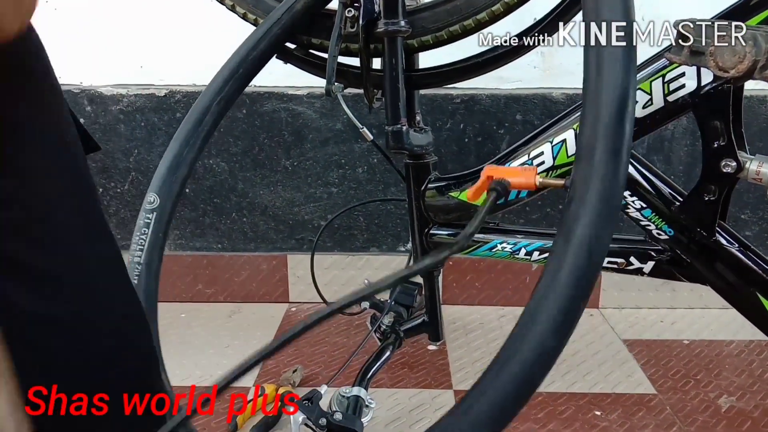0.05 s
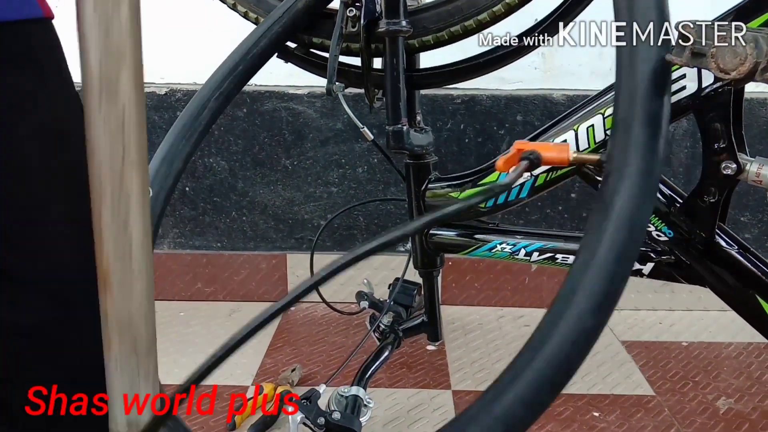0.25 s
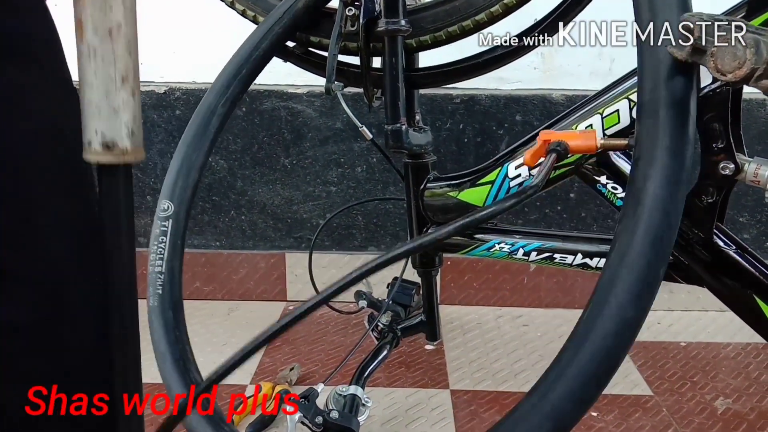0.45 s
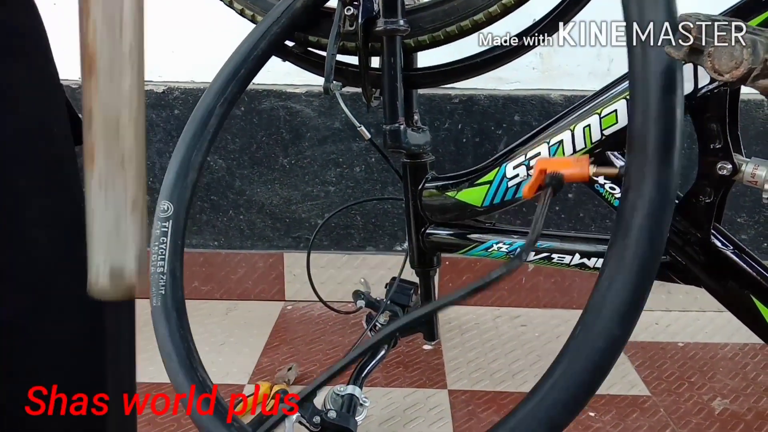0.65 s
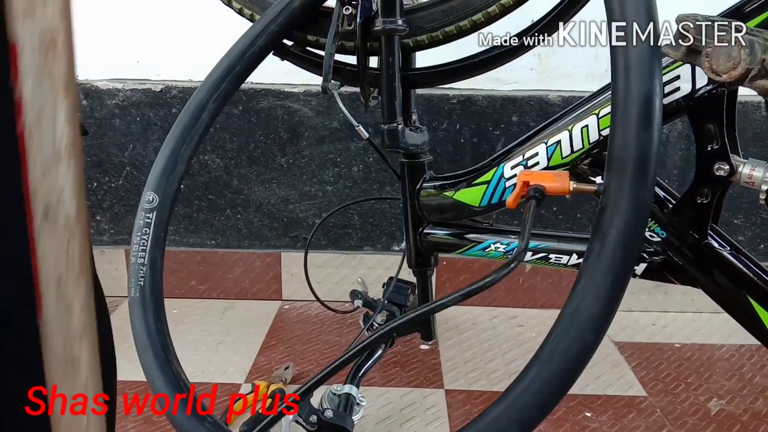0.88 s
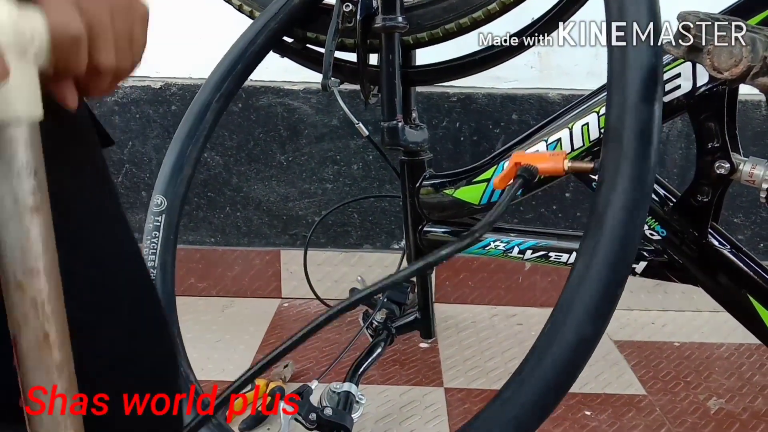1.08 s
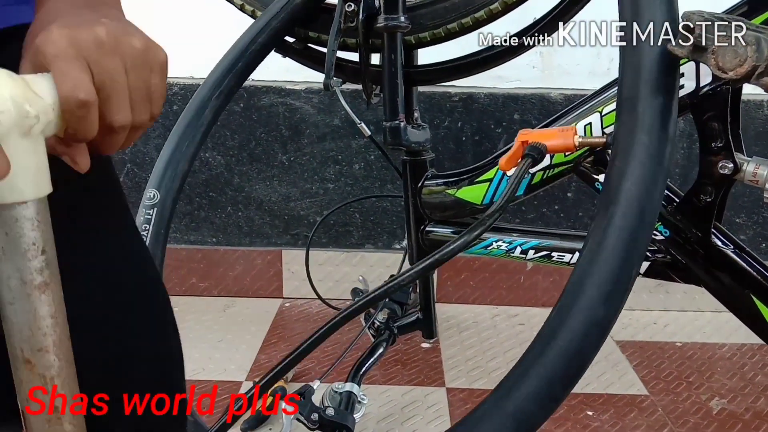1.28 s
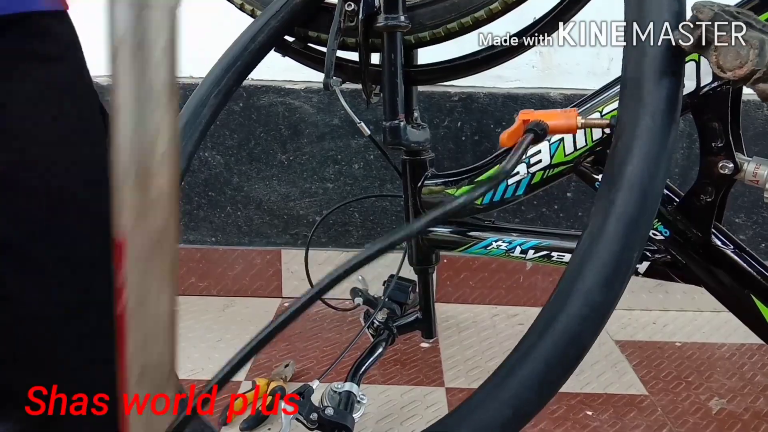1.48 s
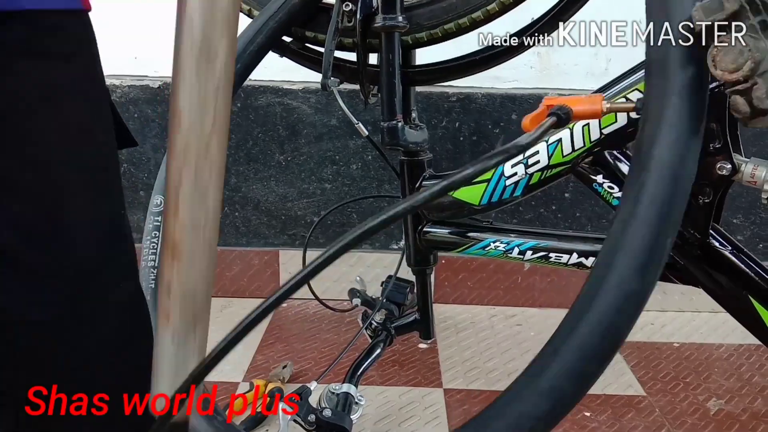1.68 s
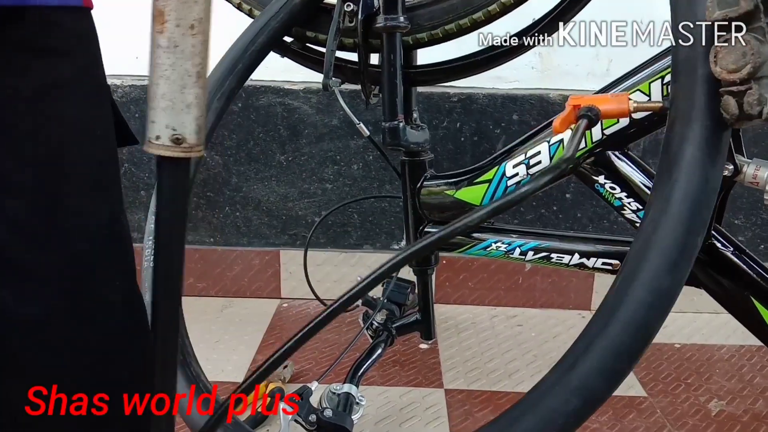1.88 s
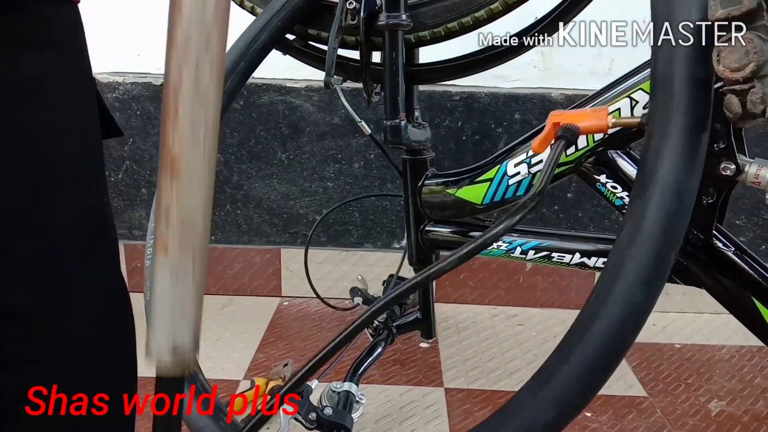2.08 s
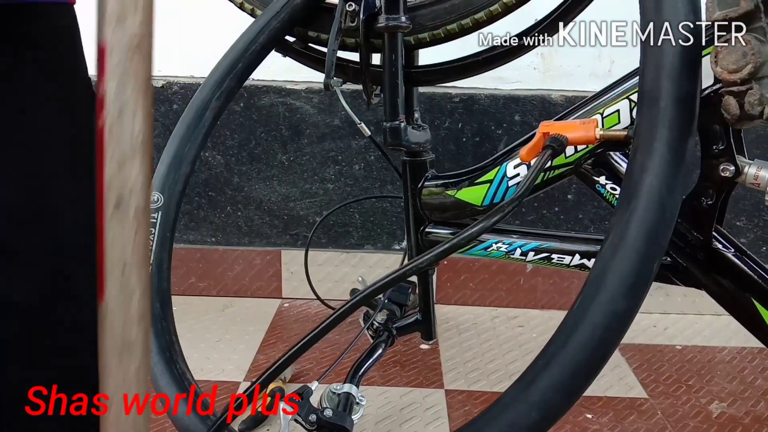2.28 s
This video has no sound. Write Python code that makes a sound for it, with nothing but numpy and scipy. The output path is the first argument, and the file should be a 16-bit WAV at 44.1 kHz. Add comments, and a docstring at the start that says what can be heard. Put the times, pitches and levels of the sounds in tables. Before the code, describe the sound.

A bicycle floor pump hisses as it is pulled up, ticks at 0.3 seconds and hits its top stop with a ringing metal clack at 0.5. Air rushes through the hose, faintly whistling, until 1.3. A second hissing pull brings a tick at 1.7 and a clack at 1.9, then another push from 2 seconds. Low rumble and thumps buffet the close microphone, mostly during the first stroke.

```python
"""Bicycle floor pump in a tiled room.

Two strokes, close to the microphone. Pulled up, the sleeve hisses through a shortening air column,
ticks as it clears the vent and clacks against its top stop, ringing the steel tube.
Pushed down, air sings through the barrel and hose. Low buffets and rumble shake the microphone."""
import sys
import numpy as np
from scipy import signal
from scipy.fft import rfft, irfft
from scipy.io import wavfile
from scipy.ndimage import uniform_filter1d

SR = 44100
rng = np.random.default_rng(int(sys.argv[2]) if len(sys.argv) > 2 else 0)


def generate_wav(signal):
    """Clip the signal to [-1, 1] and save it as 16-bit WAV at the path in sys.argv[1]."""
    frames = np.transpose(np.atleast_2d(signal))
    scaled = np.clip(frames, -1, 1) * 32767
    pcm = np.round(scaled).astype(np.int16)
    wavfile.write(sys.argv[1], SR, pcm)


N = 108045
T = np.arange(N) / SR


def amp(db):
    """Decibels to gain."""
    return 10 ** (np.asarray(db) / 20)


def unit(x):
    """Scale to rms 1."""
    return x / np.sqrt(np.mean(abs(x) ** 2) + 1e-20)


def read(points, hz):
    """Interpolate a table on a log-frequency axis."""
    freq_hz, value = np.transpose(points)
    return np.interp(np.log(hz + 1), np.log(np.maximum(freq_hz, 1)), value)


def add(mix, start_s, sound):
    """Mix a sound in at start_s."""
    part = mix[max(round(start_s * SR), 0):][:len(sound)]
    part += sound[:len(part)]


def noise(gain, size=512):
    """White noise shaped by gain(hz, t) in short frames."""
    framing = dict(nperseg=size, noverlap=size - size // 4)
    hz, t, frames = signal.stft(rng.standard_normal(N), SR, **framing)
    return signal.istft(frames * gain(hz[:, None], t[None]), SR, **framing)[1][:N]


def coloured(spectrum):
    """Steady noise of a given spectrum, rms 1."""
    gain = amp(read(spectrum, np.fft.rfftfreq(N, 1 / SR)))
    return unit(irfft(rfft(rng.standard_normal(N)) * gain, N))


def smooth_noise(shape, widths):
    """Random field of rms 1, smooth over widths in cells."""
    field = rng.standard_normal(shape)
    for axis, width in enumerate(widths):
        field = uniform_filter1d(field, max(round(width), 1), axis)
    return unit(field)


def reflected(x, echo_db, decay_s=0.01):
    """Add a quickly fading cluster of reflections off the tiles."""
    t = T[:SR // 10]
    taps = rng.choice([-1., 1.], len(t)) * (rng.random(len(t)) < 1 / 20)
    taps *= np.exp(-t / decay_s) * (t > .001)
    taps *= amp(echo_db) / np.linalg.norm(taps)
    taps[0] = 1  # direct sound
    return signal.fftconvolve(x, taps / np.linalg.norm(taps))[:N]


def room_tone(level_db=-53):
    """Steady noise of the still room."""
    # room spectrum: freq_hz, density_db
    spectrum = [(60, -11), (150, 8.5), (400, -3), (700, 0.5), (950, -7.5), (1400, 0), (2000, -16.5),
                (3000, -16), (5000, -20.5), (8000, -22), (11000, -21), (14000, -41), (15500, -27)]
    return amp(level_db) * coloured(spectrum)


def hum(length_s=0.27, pitch_hz=236.5, level_db=-43.5):
    """A faint low ring at the start of the first stroke."""
    swell = np.sin(np.pi * np.clip(T / length_s, 0, 1))
    return amp(level_db) * swell * np.sin(2 * np.pi * pitch_hz * T)


def rumble(gust_db=0.5, gust_s=0.018):
    """Gusty low noise at the microphone, brighter when louder."""
    # rumble envelope: time_s, level_db
    envelope = [(0, -43), (.06, -82), (.17, -41.5), (.22, -37.5), (.29, -23.5), (.5, -29), (.58, -24),
                (.67, -35.5), (.72, -26.5), (.78, -27.5), (.82, -23.5), (1.0, -27.5), (1.07, -28.5),
                (1.28, -29.5), (1.32, -35.5), (1.47, -37.5), (1.51, -42), (1.63, -35.5), (1.72, -31.5),
                (1.87, -50), (2.03, -40), (2.23, -39.5), (2.33, -38), (2.4, -45.5), (2.45, -33)]
    # rumble spectrum: freq_hz, density_db
    spectrum = [(20, -25), (40, -43), (65, -2), (95, 2.5), (140, -0.5), (220, -9), (350, -26.5), (550, -43),
                (1000, -54.5), (3000, -72)]

    def gain(hz, t):
        level_db = np.interp(t, *np.transpose(envelope))
        brighten_db = 0.41 * (level_db + 36.5) * np.log2(np.clip(hz, 120, 800) / 120)
        return unit(amp(read(spectrum, hz))) * amp(level_db + brighten_db)
    gusts = unit(uniform_filter1d(smooth_noise(N, [gust_s * SR]), size=300))
    return noise(gain, size=2048) * amp(gust_db * (gusts - .5))


def buffets(thump_rise_s=0.0069, flutter_rise_s=0.0059, sag=0.29):
    """Low thumps at the microphone, sagging in pitch, with turbulent flutter."""
    # thumps: start_s, level_db, centre_hz, flutter_db
    thumps = [(0.21, -12, 200, -12), (0.296, -16.5, 173, -4.5), (0.325, -14.5, 178, -3),
              (0.359, -23, 150, -8), (.392, -16.5, 118, -12), (0.43, -14.5, 129, -19.5),
              (.456, -17, 146, -3.5), (.479, -16.5, 228.6, -3.5), (.541, -23.5, 162, 1),
              (0.599, -18, 107, -18), (0.618, -14.5, 109, -14), (.7, -20, 112.5, -21.5),
              (0.794, -26, 175, 0.5), (.866, -18.5, 148, -10), (0.968, -20, 162, 1.5), (.992, -14, 98, -12),
              (1.026, -24.5, 188, -2.5), (1.085, -23.5, 142, -17), (1.266, -24, 161, -13),
              (1.353, -23, 126, -38), (1.602, -22.5, 123.4, -29.5), (2.067, -20, 141, -20.5),
              (2.132, -22.5, 124, -21), (2.171, -14.5, 126, -20.5)]
    # turbulence spectrum: freq_hz, density_db
    turbulence = [(30, -28), (70, -22.5), (200, 6), (330, 4.5), (480, -10), (700, -21), (1100, -45.5),
                  (3000, -75)]
    t = T[:SR // 10]
    thump_env, flutter_env = [(t / s * np.exp(1 - t / s)) ** 2 for s in (thump_rise_s, flutter_rise_s)]
    out = np.zeros(N)
    for start_s, level_db, centre_hz, flutter_db in thumps:
        pitch_hz = centre_hz * (1 + sag * (2 * .5 ** (t / thump_rise_s) - 1))
        thump = thump_env * np.sin(2 * np.pi * (np.cumsum(pitch_hz) / SR + rng.random()))
        flutter = amp(flutter_db) * flutter_env * coloured(turbulence)[:len(t)]
        add(out, start_s, amp(level_db) * (thump + flutter))
    return out


def rub(start_s=1.735, length_s=0.18, level_db=-50.5, centre_hz=1420, width_hz=410):
    """The tube rubs faintly after the sleeve clears the vent."""
    def gain(hz, t):
        band = unit(1 / (1 + (2 * (hz - centre_hz) / width_hz) ** 2))
        return band * (t > start_s) * (t < start_s + length_s)
    return amp(level_db) * noise(gain)


def pull(start_s, clear_s, speed_m_per_s, level_db):
    """Intake hiss echoes in a shortening air column, so its resonances sweep up."""
    # intake spectrum: freq_hz, density_db
    hiss = [(200, -18), (500, -12.5), (900, -9.5), (1250, -3), (1850, 0), (2150, -16), (2500, -6.5),
            (3800, -12), (4800, -3), (5700, -3.5), (7200, 2), (8000, -1.5), (10200, -2), (12500, -13),
            (13800, -19), (15100, -6.5), (16000, -15.5)]
    rise_s, sag_db_per_s, cut_db_per_s = 0.16, -16, -380
    reflection, loss_hz, sound_m_per_s = 0.49, 13400, 343
    flicker_db, flicker_width_hz, flicker_s = 3.5, 260, 0.02

    def gain(hz, t):
        round_trip_s = 2 * speed_m_per_s * np.maximum(clear_s - t, 0) / sound_m_per_s
        echo = reflection * np.exp(-hz / loss_hz) * (t < clear_s)
        comb = np.sqrt(1 - echo ** 2) / abs(1 - echo * np.exp(-2j * np.pi * hz * round_trip_s))
        flicker = smooth_noise(comb.shape, [flicker_width_hz / hz[1, 0], flicker_s / t[0, 1]])
        return unit(amp(read(hiss, hz))) * comb * amp(flicker_db * flicker)
    rise = np.clip((T - start_s) / rise_s, 0, 1)
    sag_db = sag_db_per_s * np.maximum(T - start_s - rise_s, 0)
    cut_db = cut_db_per_s * np.maximum(T - clear_s, 0)
    return noise(gain) * rise * amp(level_db + sag_db + cut_db)


def push(stroke, start_s, full_s, end_s, level_db, tilt_db_per_oct):
    """Forced air rings the barrel and hose; each resonance wavers as the piston moves."""
    # compressed-air spectrum: freq_hz, density_db
    rush = [(200, -8), (450, -2.5), (750, -14), (950, -14), (1200, 2), (1700, 7.5), (1950, 4.5), (2500, 5),
            (3300, 0), (4300, 3), (5400, -2), (6000, -3), (7000, 0), (8100, -10.5), (8800, -11.5),
            (9250, -5), (9800, -6), (10600, -10.5), (12000, -3), (13700, -17), (14700, -6.5), (15600, -5.5)]
    # barrel and hose resonances: centre_hz, width_hz, first_lift_db, second_lift_db
    resonances = [(1210, 38, 14, 15.5), (1394, 270, -18, 17.5), (2140, 28, 11, 10), (2264, 15, 16.5, 24.5),
                  (2490, 18, 13, 17.5), (3036, 16, 14.5, 9), (3470, 15, 14.5, 10), (4190, 20, 8.5, 14),
                  (4010, 23, 6.5, 9), (4425, 24, 15.5, 13.5), (4340, 32, 16.5, 17), (4890, 33, 18, 11),
                  (5230, 66, -4, 10.5), (5870, 90, 13.5, 13.5), (6620, 47, 4.5, 10), (10330, 140, 14.5, 16),
                  (11100, 110, 8, 12)]
    waver_db, waver_s = 3.5, 0.3
    swell_from_db, cut_db_per_s = -26, -56

    def gain(hz, t):
        wavers = np.clip(smooth_noise((len(resonances), t.size), [1, waver_s / t[0, 1]]), -2, 2)
        power = 1
        for (centre_hz, width_hz, *lift_db), waver in zip(resonances, wavers):
            peak = max(amp(lift_db[stroke]) ** 2 - 1, 0) * amp(waver_db * waver) ** 2
            power = power + peak / (1 + (2 * (hz - centre_hz) / width_hz) ** 2)
        tilt_db = tilt_db_per_oct * np.log2(np.maximum(hz, 500) / 1000)
        return unit(amp(read(rush, hz) + tilt_db) * np.sqrt(power))
    swell_db = swell_from_db * np.maximum((full_s - T) / (full_s - start_s), 0) ** 2
    cut_db = cut_db_per_s * np.maximum(T - end_s, 0)
    return noise(gain, size=2048) * amp(level_db + swell_db + cut_db)


def jolt(pitch_ratio, rebound_s=0.0059, rebound_db=-10):
    """Heavily damped first swing of sleeve and stop, and one rebound."""
    # damped modes: pitch_hz, level_db, rise_s
    modes = [(670, -14.5, 0.0011), (1119, -13.5, 0.0028), (1474, -5, 0.0012), (2560, -19, 0.0023),
             (4210, -49, 0.00047), (6240, -29, 0.00071)]
    t = T[:SR // 10]
    swing = sum(amp(db) * t / rise_s * np.exp(1 - t / rise_s) * np.sin(2 * np.pi * hz * pitch_ratio * t)
                for hz, db, rise_s in modes)
    return swing + amp(rebound_db) * np.interp(t - rebound_s, t, swing, left=0)


def blow(ring_db, contact_spectrum, contact_s, contact_db, pitch_ratio=1):
    """A jolt and a burst of contact noise; the tube rings and the room answers."""
    # steel tube modes: pitch_hz, level_db, t60_s
    modes = [(1107, -37.5, 0.37), (1290, -28, 0.39), (1382, -14, 0.067), (1425, -24, 0.073),
             (1655, -19.5, 0.13), (1790, -26, 0.17), (2093, -30.5, 0.26), (2460, -32.5, 0.12),
             (2514, -56, 0.1), (2864, -34.5, 0.42), (5010, -33, .25), (5380, -67, 0.15), (5400, -29, 0.073)]
    # reverberation spectrum: freq_hz, density_db
    wash_spectrum = [(180, -50), (300, -8.5), (454, -10), (798, -5.5), (990, -21.5), (1550, -2),
                     (1950, -27.5), (2090, -8), (2910, -11.5), (4630, -26.5), (5030, -12.5), (6350, -29.5),
                     (15000, -42), (15800, -28)]
    # room decay: freq_hz, t60_s
    room_decay = [(300, 0.31), (1500, 0.46), (5000, 0.37), (14000, 0.41)]
    wash_db, build_s = -23.5, 0.0049

    def wash_gain(hz, t):
        return unit(amp(read(wash_spectrum, hz))) * amp(wash_db - 60 * t / read(room_decay, hz))
    t = T[:SR * 2 // 3]
    ring = sum(amp(db - 60 * t / t60_s) * np.sin(2 * np.pi * (hz * t + rng.random()))
               for hz, db, t60_s in modes)
    wash = noise(wash_gain, size=256)[:len(t)]
    out = amp(ring_db) * (ring + wash) * (1 - np.exp(-t / build_s))
    burst = np.minimum(t / (contact_s / 5), 1) * np.exp(-t / contact_s)
    out += amp(contact_db) * coloured(contact_spectrum)[:len(t)] * burst
    add(out, 0, jolt(pitch_ratio))
    return out


def sleeve(crack_s=0.0043):
    """The sleeve clacks on its top stop and ticks lightly along the way."""
    # top-stop blows: start_s, level_db, pitch_ratio, ring_db, crack_db
    clacks = [(0.5061, -1, 1.0, 2.5, -8), (1.9142, -1, 1, 2.5, -10.5)]
    # clack contact spectrum: freq_hz, density_db
    crack = [(120, -41), (200, 2), (788, -32.5), (1520, -1), (2080, -16), (4160, -17), (6690, -28.5),
             (13400, -43), (14700, -28), (15800, -44)]
    # light contacts: start_s, level_db, scrape_s, ring_db, scrape_db
    ticks = [(0.02, -31, 0.014, 1, 2.5), (0.3097, -20, 0.0056, -2.5, -7.5), (0.493, -45, 0.0036, 13, 1),
             (0.7596, -33.5, 0.016, 12, 1), (1.405, -31.5, 0.0033, -10, -12),
             (1.454, -32.5, 0.0016, -25, 0), (1.7308, -17.5, 0.0023, -0.5, -8.5)]
    # tick contact spectrum: freq_hz, density_db
    scrape = [(200, 2), (800, -21.5), (1400, 3), (2000, 1), (2800, -6), (3600, -5.5), (6000, -9),
              (9000, -13.5), (15000, -21)]
    out = np.zeros(N)
    for start_s, level_db, pitch_ratio, ring_db, crack_db in clacks:
        add(out, start_s, amp(level_db) * blow(ring_db, crack, crack_s, crack_db, pitch_ratio))
    for start_s, level_db, scrape_s, ring_db, scrape_db in ticks:
        add(out, start_s, amp(level_db) * blow(ring_db, scrape, scrape_s, scrape_db))
    return out


def scene():
    """Two pump strokes over rumble and room tone, all centred."""
    # upstrokes: start_s, clear_s, speed_m_per_s, level_db
    pulls = [(-.09, 0.296, 1.236, -36.5), (1.327, 1.723, 1.0, -37)]
    # downstrokes: start_s, full_s, end_s, level_db, tilt_db_per_oct
    pushes = [(.56, .85, 1.316, -41.5, 2.5), (1.97, 2.3, 2.6, -38.5, 3.14)]
    intake = reflected(sum(pull(*row) for row in pulls), echo_db=-5.5)
    outflow = reflected(sum(push(stroke, *row) for stroke, row in enumerate(pushes)), echo_db=0)
    mono = intake + outflow + sleeve() + rub() + rumble() + buffets() + hum() + room_tone()
    return np.array([mono, mono])


def record(dry):
    """Microphone bass roll-off, clip at full scale, band limit."""
    low_cut_hz, high_cut_hz = 49, 15560
    highpass = signal.butter(3, low_cut_hz, "highpass", fs=SR, output="sos")
    lowpass = signal.firwin(511, high_cut_hz, window=("kaiser", 9), fs=SR)
    clipped = np.clip(signal.sosfilt(highpass, dry), -1, 1)
    return signal.oaconvolve(clipped, lowpass[None], "same")


dry = scene()
out = record(dry)
generate_wav(out)
```